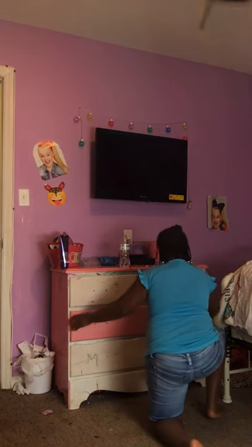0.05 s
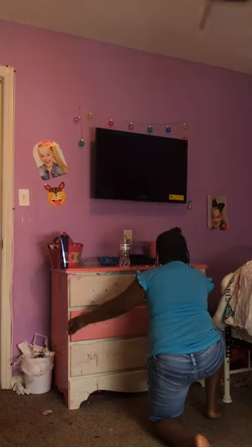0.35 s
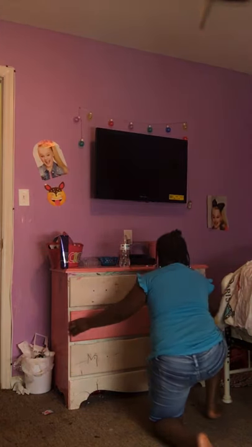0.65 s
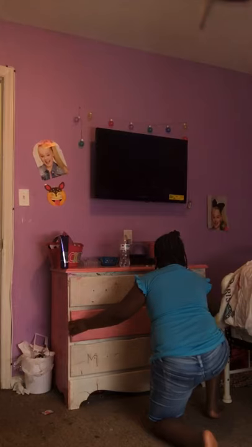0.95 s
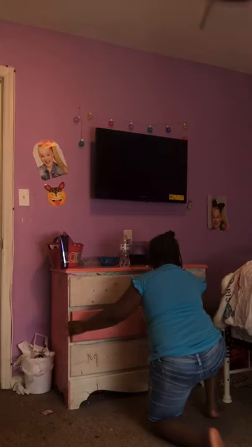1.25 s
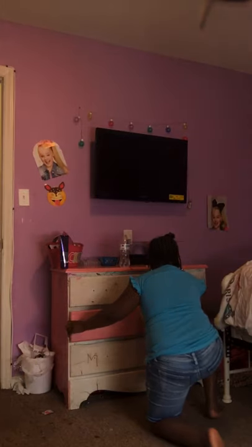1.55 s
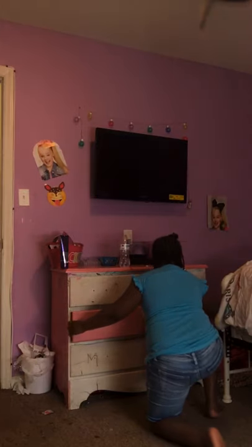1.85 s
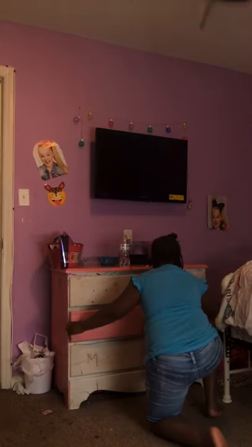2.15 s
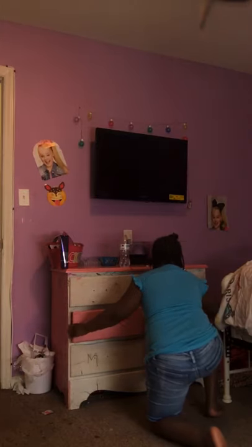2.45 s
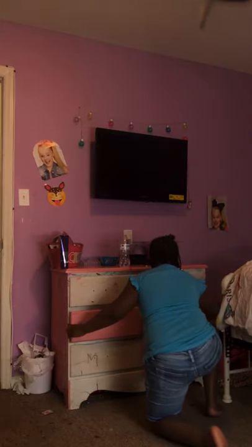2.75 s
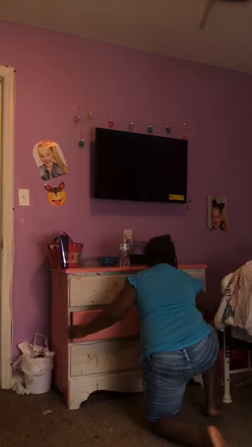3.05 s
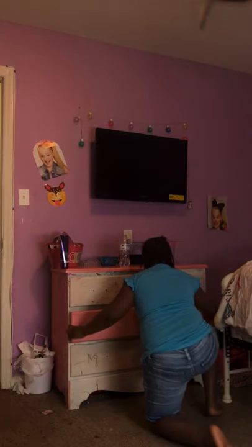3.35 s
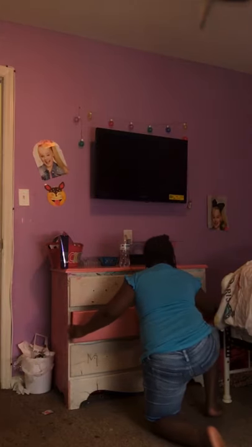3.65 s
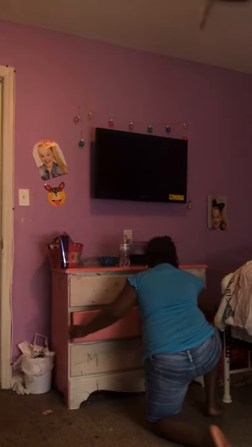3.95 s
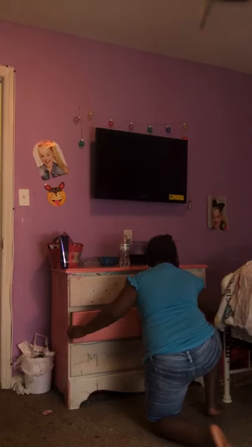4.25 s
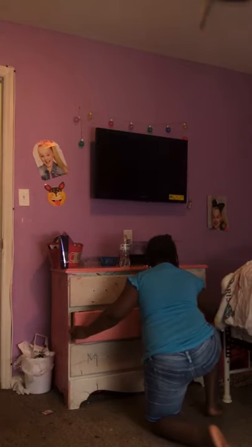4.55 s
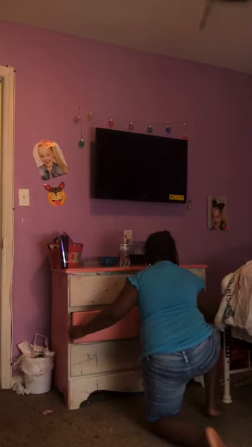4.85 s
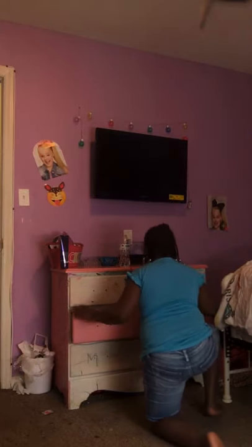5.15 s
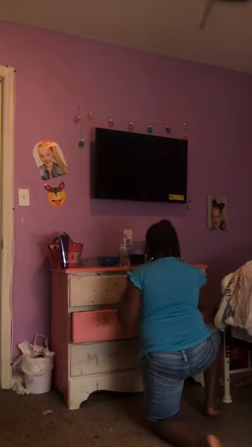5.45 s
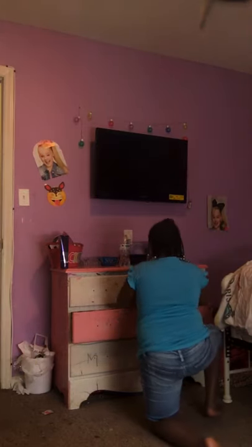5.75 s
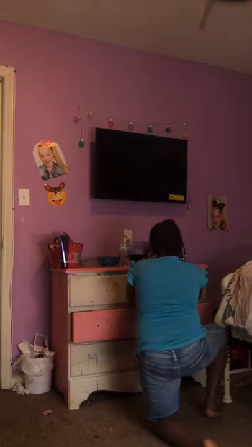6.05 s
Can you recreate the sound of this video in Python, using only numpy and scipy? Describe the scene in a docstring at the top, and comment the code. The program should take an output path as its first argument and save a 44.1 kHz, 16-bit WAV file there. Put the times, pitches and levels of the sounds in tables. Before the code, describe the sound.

Someone works at a jammed wooden dresser drawer in a small room. After light rattles and faint taps comes a fast, uneven run of sharp, hollow knocks lasting about three seconds, mixed with dull bumps, ticks and dry scrapes. The knocking gives way to a soft slide, a brief rattle of small objects and a last faint knock. A low hum and a soft hiss lie behind it.

```python
"""A sticking wooden drawer in a small bedroom. First, over a low hum, small loose things rattle.
Near 1 s come a few faint knocks; from 1.6 s the drawer is tugged and shoved about four times a second.
Each jerk cracks against the runners, rings the boards and makes the hollow carcass (the dresser's body)
boom. In between, the wood bumps, rubs and ticks while a soft hiss swells. After 4.8 s the drawer
slides softly, the loose things rattle again, and one faint knock comes at 6 s."""
import sys
import numpy as np
from scipy import signal
from scipy.fft import rfft, irfft
from scipy.io import wavfile

SR = 44100
rng = np.random.default_rng(int(sys.argv[2]) if len(sys.argv) > 2 else 0)


def master(y):
    """Save y as 16-bit WAV."""
    cut = np.clip(np.atleast_2d(y).T, -1, 1)
    pcm = np.round(cut * 32767)  # scale
    wavfile.write(sys.argv[1], SR, pcm.astype(np.int16))


N = 268569

# Levels in the tables are relative: the functions add their own gains. Spectra give level per hertz.
# spectrum of the room noise: pitch_hz, level_db
ROOM_SPECTRUM = [(15, -35), (25, -5.5), (59, 1), (126, -5.5), (206, -16), (262, -14), (438, -26),
                 (1690, -36.5), (2600, -37.5), (4470, -37), (4850, -63), (5400, -43.5), (10300, -56.5),
                 (13900, -58), (15900, -74)]
# tones of the hum: pitch_hz, level_db
HUM_TONES = [(58.5, -54), (119.2, -61), (246, -69)]
# spectrum of the hiss: pitch_hz, level_db
HISS_SPECTRUM = [(300, -30), (650, -1), (950, -0.5), (1600, 0), (2200, -6), (3400, -19.5), (5000, -39)]
# how the hiss swells: time_s, level_db
HISS_LEVELS = [(0.0, -72), (2.37, -62.5), (3.07, -55.5), (3.46, -59.5), (3.97, -56), (4.66, -57),
               (4.8, -59.5), (6.09, -60)]
# the strongest band of the hiss: time_s, pitch_hz
HISS_PITCHES = [(0, 1157), (2.4, 1100), (3.3, 1143), (4.5, 1250), (5.2, 1345), (5.65, 1488), (6.09, 1247)]
# spectrum of wood rubbing on the runners: pitch_hz, level_db
RUB_SPECTRUM = [(100, 7.5), (350, 22.5), (600, 14), (2000, 11.5), (4000, 3.5), (4900, 1), (6000, 3),
                (8000, -7), (10300, -12.5), (13000, -10), (16000, -18)]
# loose things rattling: start_s, bright_ring_db, dull_ring_db, rise_s
RATTLE_HITS = [(0.105, -54, -83, .0005), (0.134, -59, -82, .003), (0.191, -65.5, -69, .002),
               (0.598, -62.5, -52.5, 0.00086), (0.675, -66, -55, 0.0018), (5.149, -52, -59.5, 0.025),
               (5.196, -49, -47, 0.00054), (6.018, -58.5, -54.5, 0.00053)]
# tones they ring with: pitch_hz, level_db, fade_s (a fade is the time to drop by 60 dB)
RATTLE_TONES = [(1270, -7.5, 0.24), (1433, -6, 0.13), (1740, -5.5, 0.14), (2060, -3.5, 0.21),
                (2370, -5.5, 0.14), (3070, -9, 0.14), (3540, -3, 0.12), (4080, -10, 0.13),
                (4420, -7.5, 0.16)]
# dry scrapes of wood on wood: start_s, level_db, length_s
WOOD_SCRAPES = [(0.398, -67, 0.062), (1.237, -59, 0.16), (2.834, -80, 0.18), (3.064, -56, 0.084),
                (3.664, -62, 0.16), (4.145, -58.5, 0.09), (4.968, -64, 0.04), (5.97, -55.5, 0.03)]
# dry ticks of the wood: start_s, level_db
WOOD_TICKS = [(0.6, -55.5), (0.94, -68), (1.07, -67), (1.942, -40), (2.093, -63), (2.461, -43.5),
              (3.0593, -51.5), (3.388, -58.5), (3.9409, -56), (4.167, -57), (4.5655, -49), (4.9798, -56),
              (5.8401, -57), (6.018, -57)]
# spectrum of a tick: pitch_hz, level_db
TICK_SPECTRUM = [(800, -13), (2500, 7), (6000, 2.5), (10000, -11), (13500, -6.5), (16000, -15)]
# further soft bumps, some as the drawer settles just after a jerk, others as it rocks: start_s, level_db,
# pitch_hz
HOLLOW_BUMPS = [(0.127, -50, 373), (0.199, -57, 249), (0.95, -45.5, 336), (1.079, -44, 355),
                (1.117, -47, 401), (3.288, -41.5, 241.7), (3.609, -36, 244), (4.583, -39, 338),
                (5.901, -48, 299), (6.024, -47, 291)]
# jerks of the drawer:
# start_s, strength_db, hardness_db_per_octave, extra_ring_db, boom_db, settles_after_s, hollow_note_hz
JERKS = [(0.9334, -56, -1, 3, -52, .012, 328), (1.0664, -53.5, -1, 7, -59, .009, 366),
         (1.2492, -58, -3.5, -6, -50, .015, 250), (1.6075, -43, 0.94, -6, -40, .018, 109),
         (1.9342, -41, -0.2, 3.5, -35.5, .016, 317), (2.2342, -43, -.2, -2, -36.5, .018, 109),
         (2.4603, -39.5, -2, 1, -36.5, .016, 247), (2.718, -38.5, -1.4, -2.5, -32.5, 0.13, 244.5),
         (2.9599, -37.5, -2, 0, -39.5, 0.042, 352), (3.1876, -39.5, -0.9, -1, -35, .018, 218),
         (3.5681, -39.5, -1.06, 1.5, -41.5, .023, 247), (3.782, -39, -1.26, -2, -32.5, 0.094, 242),
         (4.0295, -38, -1.77, -1.5, -34, .061, 321), (4.2741, -43, .3, -2.5, -39.5, .018, 199),
         (4.3551, -49.5, -4.5, 2.5, -52, .012, 235), (4.5213, -41.5, -0.8, 1.5, -32, 0.055, 205),
         (4.566, -44, -1.5, 5, -55, 0.072, 347), (4.6066, -48, 1, -7, -43, .061, 394),
         (4.776, -46, 1.25, 0.5, -37.5, .018, 214), (6.0189, -58, -1.2, 0, -73, 0.016, 418)]
# spectrum of the boards ringing in the room: pitch_hz, level_db
BOARD_SPECTRUM = [(50, -26), (90, -30), (200, -31.5), (280, -34), (400, -35), (480, -38.5), (750, -35.5),
                  (1600, -36.5), (2500, -43), (4000, -50), (4900, -56), (5700, -55.5), (9500, -61),
                  (13500, -67), (16000, -97)]
# how fast that ring builds up: pitch_hz, rise_s
BOARD_RISES = [(80, .012), (300, 0.0064), (900, 0.0042), (2500, 0.0022), (8000, 0.0012)]
# how slowly it dies away: pitch_hz, fade_s
BOARD_FADES = [(80, 0.7), (250, 0.39), (700, 0.26), (2000, 0.17), (6000, 0.39), (14000, 0.18)]
# tones of the drawer and carcass: pitch_hz, level_db, fade_s
DRAWER_TONES = [(88.2, 1.5, 0.2), (111.5, -5.5, 0.28), (151.2, -3.5, 0.16), (201.2, -2.5, 0.14),
                (239.2, -6.5, 0.13), (333.3, -5, 0.15), (402, -17, 0.36), (547.5, -8, 0.13),
                (595, -10.5, 0.12), (688.3, -7.5, 0.1), (787, -8.5, 0.18), (828, -14, 0.23),
                (1180, -16, 0.16), (1234, -14.5, 0.2), (1567, -8.5, 0.11), (1563, -13, 0.19),
                (2054, -9.5, 0.13), (2520, -13.5, 0.13), (3450, -14.5, 0.11), (4140, -18, 0.21),
                (5130, -19, 0.13), (5620, -17, 0.12), (6520, -20.5, 0.1)]
# echoes from nearby surfaces: delay_s, level_db
NEAR_ECHOES = [(.0013, -22), (.0029, -41), (.0047, -28.5), (.0071, -26.5)]

BLOW_TOP_HZ = 4150  # a blow's level at this pitch sets its crack and snap


def amp(db):
    """Turns decibels into a factor to multiply by."""
    return 10 ** (np.asarray(db) / 20)


def evened(x):
    """Scales a signal to an average power of 1."""
    return x / np.sqrt(np.mean(x ** 2) + 1e-20)


def read(points, hz):
    """Looks up a table at a pitch, on a scale of octaves."""
    pitches, values = np.transpose(points)
    return np.interp(np.log(hz + 1), np.log(pitches + 1), values)


def add(mix, start_s, sound):
    """Lays a sound into the mix."""
    part = mix[max(round(start_s * SR), 0):][:len(sound)]
    part += sound[:len(part)]


def coloured(x, spectrum):
    """Filters x by a spectrum, then evens its power."""
    hz = np.fft.rfftfreq(len(x), 1 / SR)
    return evened(irfft(rfft(x) * amp(read(spectrum, hz)), len(x)))


def wander(rate_hz):
    """A random drift, mostly slower than rate_hz."""
    keep_slow = 1 + (np.fft.rfftfreq(N, 1 / SR) / rate_hz) ** 4
    return evened(irfft(rfft(rng.standard_normal(N)) / keep_slow, N))


def swell(t, rise_s, fade_s):
    """A loudness curve that builds up to 1, then dies away."""
    shape = (1 - np.exp(-t / rise_s)) * np.exp(-np.log(1000) * t / fade_s)
    return shape / shape.max()


def crackling(t, spread_db, samples=50):
    """Noise broken into uneven splinters, each about a millisecond long."""
    splinters_db = spread_db * rng.standard_normal(len(t) // samples + 1)
    return evened(rng.standard_normal(len(t)) * amp(np.repeat(splinters_db, samples)[:len(t)]))


def room(noise_db=-53):
    """Low room noise and a wavering hum."""
    t = np.arange(N) / SR
    hum = sum(amp(db) * np.sqrt(2) * np.sin(2 * np.pi * hz * t + 0.51 * wander(4.4))
              for hz, db in HUM_TONES)
    return hum + amp(noise_db) * coloured(rng.standard_normal(N), ROOM_SPECTRUM)


def hiss(gain_db=-3, band_width_hz=330):
    """A soft hiss swells, and its strongest band drifts in pitch."""
    t = np.arange(N) / SR
    phase = 2 * np.pi * np.cumsum(np.interp(t, *np.transpose(HISS_PITCHES))) / SR
    band = wander(band_width_hz) * np.cos(phase) + wander(band_width_hz) * np.sin(phase)
    wide_noise = coloured(rng.standard_normal(N), HISS_SPECTRUM)
    level_db = np.interp(t, *np.transpose(HISS_LEVELS)) + wander(31)
    return amp(level_db + gain_db) * (wide_noise + band)


def rubbing(slips_per_s=150, build_s=0.14, stop_s=0.027, slide_db=-65, steady_db=-70.5):
    """Wood rubs on the runners in tiny slips, louder as the drawer speeds into each knock."""
    t = np.arange(N) / SR
    slide = amp(-63.5) * np.exp(-((t - 5.08) / 0.2) ** 2)  # one slide ends softly, with no knock
    for start_s, *_ in JERKS:
        stroke = np.exp(-abs(t - start_s) / np.where(t < start_s, build_s, stop_s))
        slide = np.maximum(slide, amp(slide_db) * stroke)
    slips = evened(rng.standard_normal(N) * (rng.random(N) < slips_per_s / SR))
    friction = coloured(rng.standard_normal(N) + amp(-7) * slips, RUB_SPECTRUM)
    return np.hypot(slide, amp(steady_db)) * amp(2 * wander(23)) * friction


def rattles(gain_db=-2):
    """Small hard things brush or strike each other and ring briefly, blurred by the room."""
    t, out = np.arange(SR // 2) / SR, np.zeros(N)
    spectrum = [(1200, 0.5), (3200, 9), (4400, 3), (6000, 1.5), (9000, -17), (15000, -26)]
    for start_s, bright_db, dull_db, rise_s in RATTLE_HITS:
        clatter = coloured(rng.standard_normal(len(t)), spectrum)
        sound = amp(bright_db - 5) * clatter * swell(t, rise_s, fade_s=0.26)
        for hz, db, fade_s in RATTLE_TONES:
            wave = np.sin(2 * np.pi * (hz * rng.uniform(0.94, 1.003) * t + rng.random()))
            hit_db = read([(1750, dull_db), (2400, bright_db)], hz)
            sound += amp(db + hit_db) * swell(t, rise_s, fade_s) * wave
        add(out, start_s, amp(gain_db) * sound)
    return out


def scrapes():
    """Wood slides on wood, brief and gritty."""
    t, out = np.arange(SR // 2) / SR, np.zeros(N)
    spectrum = [(200, -3), (600, 4), (950, 4), (2000, -8.5), (4000, -12.5), (7000, -21), (15000, -41)]
    for start_s, db, length_s in WOOD_SCRAPES:
        grit = coloured(crackling(t, spread_db=4), spectrum)
        add(out, start_s, amp(db) * swell(t, length_s / 2, 3 * length_s) * grit)
    return out


def tick(t, fall_s=0.0017):
    """A short splintery contact, thrown back by wall and ceiling, with a faint tail."""
    shape = amp(-15) * swell(t, rise_s=0.0021, fade_s=0.21)
    for delay_s, db in [(0, 0), (0.022, -13), (0.040, -21)]:  # direct, wall, ceiling
        shape += amp(db) * (t >= delay_s) * np.exp(-abs(t - delay_s) / fall_s)
    return shape * coloured(crackling(t, spread_db=2), TICK_SPECTRUM)


def ticks(gain_db=-1):
    """Light contacts that do not ring the boards."""
    t, out = np.arange(SR // 4) / SR, np.zeros(N)
    for start_s, db in WOOD_TICKS:
        add(out, start_s, amp(db + gain_db) * tick(t))
    return out


def bumps(gain_db=-4):
    """The drawer settles or rocks: one hollow note in a dull thud, with no crack."""
    t, out = np.arange(SR // 3) / SR, np.zeros(N)
    spectrum = [(80, -20), (170, 4.5), (280, -9.5), (420, -4), (600, -17.5), (1100, -25), (3000, -86)]
    # the settling note is louder after a strong jerk and a long fall
    settling = [(start_s + fall_s, -45.5 + 0.2 * (strength_db + 40) + 64 * fall_s, hz)
                for start_s, strength_db, *_, fall_s, hz in JERKS]
    for start_s, db, hz in settling + HOLLOW_BUMPS:
        note = np.sin(2 * np.pi * (hz * t + rng.random()))
        thud = amp(-4) * coloured(rng.standard_normal(len(t)), spectrum)
        add(out, start_s, amp(db + gain_db) * swell(t, rise_s=0.0047, fade_s=0.13) * (note + thud))
    return out


def blow_spectrum(strength_db, hardness, ring_db, middle_hz=1000):
    """The harder a blow, the brighter it is, with a lift where the boards ring most."""
    lifts = [(252, 0), (546, ring_db), (980, ring_db), (1840, 0), (BLOW_TOP_HZ, 0)]
    return [(hz, strength_db + hardness * np.log2(hz / middle_hz) + lift_db) for hz, lift_db in lifts]


def snaps(jerk_gain_db=-15.5, tick_gain_db=-13.5):
    """As the sticking wood lets go, each jerk and tick carries a thin, very high snap."""
    t, out = np.arange(SR // 10) / SR, np.zeros(N)
    spectrum = [(3000, -40), (9000, -9), (11500, -1), (14000, -3), (16000, -12)]
    on_jerks = [(start_s, read(blow_spectrum(db, hardness, ring_db), BLOW_TOP_HZ) + jerk_gain_db)
                for start_s, db, hardness, ring_db, *_ in JERKS]
    on_ticks = [(start_s, db + tick_gain_db) for start_s, db in WOOD_TICKS]
    for start_s, db in on_jerks + on_ticks:
        fizz = coloured(rng.standard_normal(len(t)), spectrum)
        add(out, start_s, amp(db) * swell(t, rise_s=0.00061, fade_s=0.017) * fizz)
    return out


def blows(duller_db_per_octave=3):
    """Each jerk strikes, then drops back on the runners: duller, and the later, the weaker."""
    for start_s, strength_db, hardness, ring_db, boom_db, delay_s, _ in JERKS:
        yield start_s, blow_spectrum(strength_db, hardness, ring_db), boom_db
        loss_db = 5 + 78 * delay_s
        dull_blow = blow_spectrum(strength_db - loss_db, hardness - duller_db_per_octave, ring_db)
        yield start_s + delay_s, dull_blow, boom_db - loss_db


def boards(t, noise, blow):
    """The boards ring with a crowd of tones: high ones speak at once, heavy low ones build up."""
    hz = np.fft.rfftfreq(len(t), 1 / SR)
    centres_hz = np.geomspace(60, 15360, 17)  # bands half an octave apart
    colour = amp(read(BOARD_SPECTRUM, hz) + read(blow, hz))
    spectrum, out = rfft(noise) * colour, np.zeros(len(t))
    for centre_hz, this_band in zip(centres_hz, np.eye(len(centres_hz))):
        share = np.interp(np.log(hz + 1), np.log(centres_hz), this_band)
        shape = swell(t, read(BOARD_RISES, centre_hz), read(BOARD_FADES, centre_hz))
        ring = irfft(spectrum * share, len(t)) * shape
        power = np.sum(share * colour ** 2) * hz[1] * np.mean(shape ** 2)
        out += evened(ring) * np.sqrt(power)
    return out


def carcass_boom(t, pitch_hz=54, peak_s=0.039):
    """The hollow body booms a moment after a blow."""
    shape = (t / peak_s * np.exp(1 - t / peak_s)) ** 2
    return shape * np.sin(2 * np.pi * pitch_hz * rng.uniform(0.92, 1.04) * t)


def knocks(alike=0.15, detune=0.0085, spot_spread_db=5):
    """Each blow lands on a slightly different spot of the same boards: a crack, a ring and a boom."""
    t, out = np.arange(SR * 2 // 3) / SR, np.zeros(N)
    shared_noise = rng.standard_normal(len(t))
    for start_s, blow, boom_db in blows():
        noise = np.sqrt(alike) * shared_noise + np.sqrt(1 - alike) * crackling(t, spread_db=2)
        crack_db = read(blow, BLOW_TOP_HZ) - 2
        sound = boards(t, noise, blow) + amp(crack_db) * tick(t)
        for hz, db, fade_s in DRAWER_TONES:
            spot, stretch, phase = rng.uniform(-1, 1, 3)
            wave = np.sin(2 * np.pi * (hz * (1 + detune * stretch) * t + phase))
            tone_db = db - 3 + read(blow, hz) + spot_spread_db * spot  # the spot favours some tones
            sound += amp(tone_db) * swell(t, read(BOARD_RISES, hz), fade_s) * wave
        add(out, start_s, sound + amp(boom_db + 2) * carcass_boom(t))
    return out


def with_echoes(x, above_hz=900):
    """Small nearby surfaces throw back the high part of the sound."""
    treble = signal.sosfilt(signal.butter(2, above_hz, "high", fs=SR, output="sos"), x)
    out = x.copy()
    for delay_s, db in NEAR_ECHOES:
        add(out, delay_s, amp(db) * treble)
    return out


def scene():
    """The drawer and its background, in one channel."""
    drawer = knocks() + bumps() + scrapes() + ticks() + snaps() + rattles() + rubbing()
    return with_echoes(drawer + hiss() + room())[None]


def record(dry, low_cut_hz=36, high_cut_hz=15750):
    """The microphone loses the deep bass; then the highest treble is cut off."""
    thinned = signal.sosfilt(signal.butter(4, low_cut_hz, "high", fs=SR, output="sos"), dry)
    high_cut = signal.firwin(511, high_cut_hz, window=("kaiser", 9), fs=SR)
    return signal.oaconvolve(thinned, high_cut[None], "same")


dry = scene()
out = record(dry)
master(out)
```